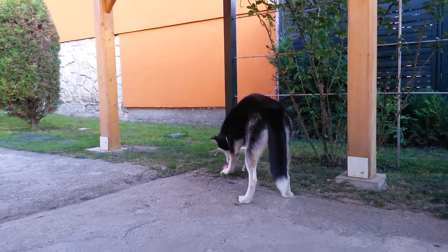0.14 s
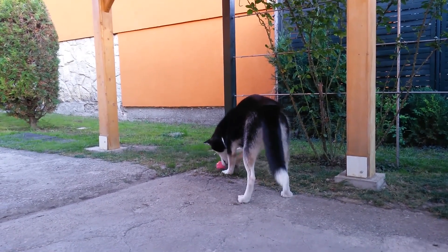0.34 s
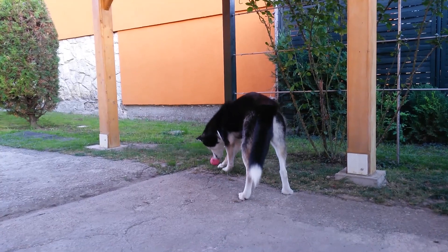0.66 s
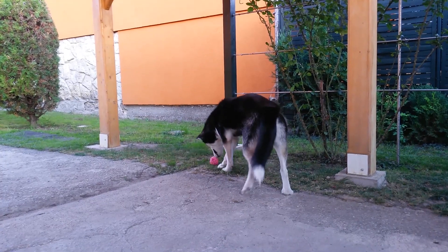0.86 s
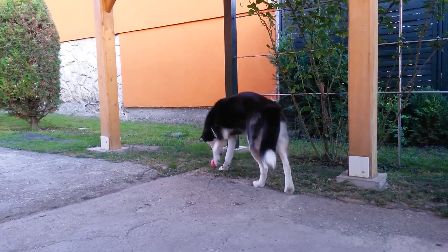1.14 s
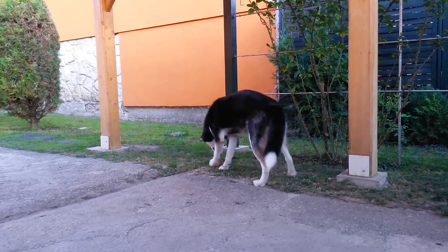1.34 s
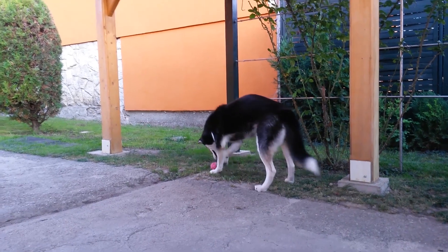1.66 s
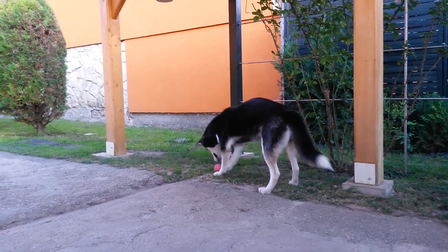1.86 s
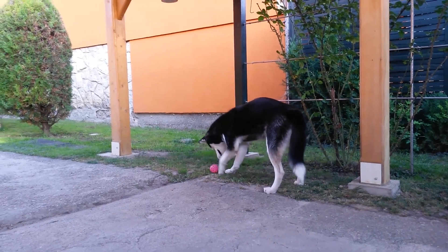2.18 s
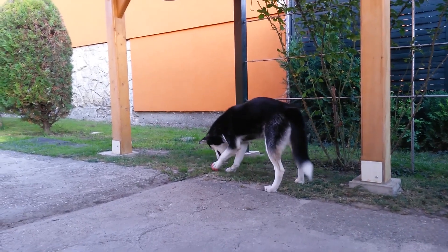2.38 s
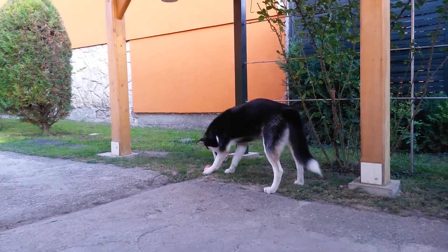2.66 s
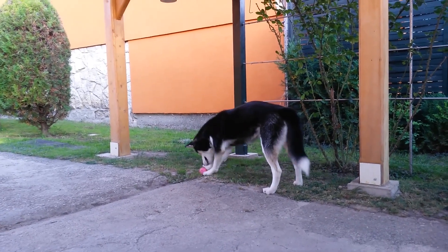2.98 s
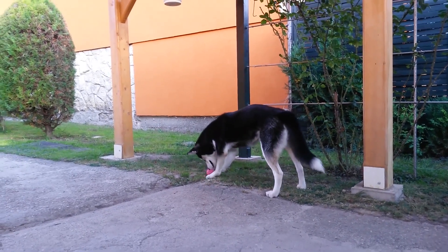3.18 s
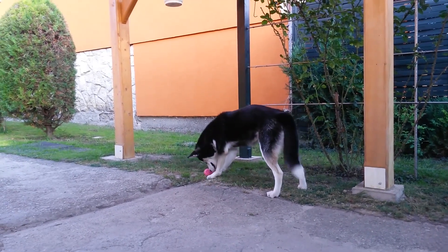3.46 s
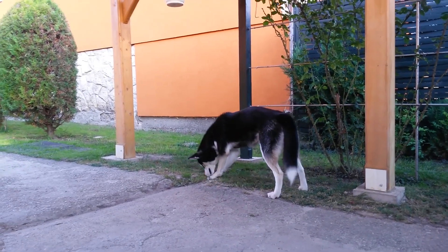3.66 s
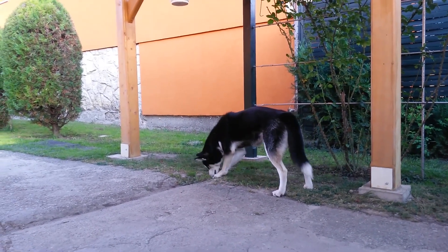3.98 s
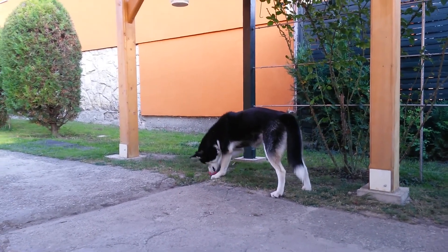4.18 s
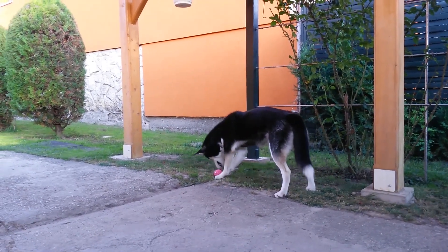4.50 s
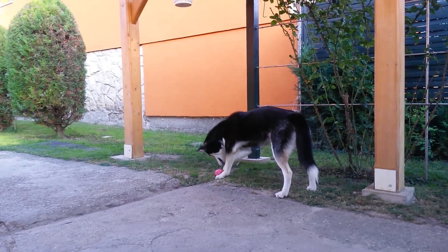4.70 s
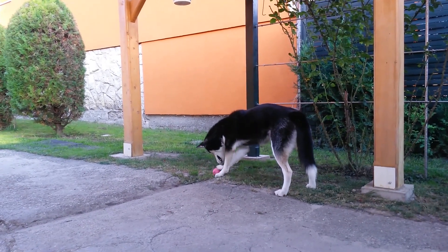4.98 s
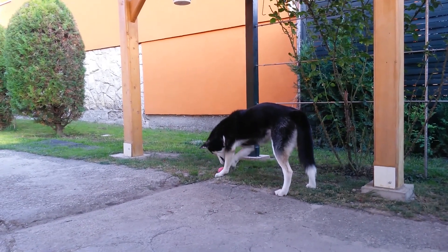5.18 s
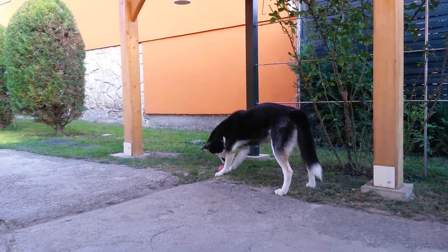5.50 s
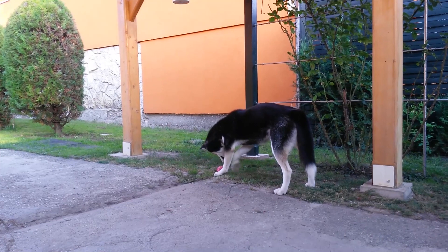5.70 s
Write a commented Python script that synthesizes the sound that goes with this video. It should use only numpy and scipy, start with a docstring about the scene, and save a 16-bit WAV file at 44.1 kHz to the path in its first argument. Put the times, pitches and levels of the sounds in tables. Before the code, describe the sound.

Irregular plastic clicks and gritty scuffs from a dog playing with a ball in a yard, with one short creak and a receding vehicle.

```python
"""At the edge of a concrete yard, a dog noses and paws a hollow plastic ball under a porch roof.
Bursts of impulses ring the ball's shell as clicks and drags; shaped grit makes the scuffs; it judders and squeaks once.
Hard echoes and a short diffuse tail follow the contacts, while a vehicle, shaped noise, recedes.
Far streets, a low hum, a thin whine and hiss lie behind; something ticks once at the right microphone."""
import sys
import numpy as np
from scipy import signal
from scipy.fft import rfft, irfft, next_fast_len
from scipy.io import wavfile
from scipy.ndimage import map_coordinates

SR = 44100
rng = np.random.default_rng(int(sys.argv[2]) if len(sys.argv) > 2 else 0)


def put_to_file(sound):
    """Save the sound as 16-bit audio at rate SR, in the file named by the first command-line argument."""
    columns = np.atleast_2d(sound).T  # one column per channel
    safe = np.clip(columns, -1, 1)
    whole_steps = np.round(safe * 32767)
    wavfile.write(sys.argv[1], SR, whole_steps.astype(np.int16))


N = 257984
TIME = np.arange(N) / SR  # seconds through the scene
T = np.arange(SR // 2) / SR  # seconds within one event

# spectrum of low traffic rumble: f/Hz, relative density/dB per Hz
RUMBLE = [(20, -31), (40, -20), (65, -6.5), (100, -2.5), (137, 3.5), (190, -2.5), (265, -3), (360, -10.5),
          (500, -8), (900, -52)]
# spectrum of tyre roar: f/Hz, relative density/dB per Hz
TYRES = [(200, -20), (400, -11.5), (550, -1.5), (780, -2), (1100, 2), (1500, -3), (2200, -7), (3200, -15.5),
         (6000, -21), (12000, -57)]


def amp(db):
    """Decibels to gain."""
    return 10 ** (np.asarray(db) / 20)


def unit(x):
    """Scale x to rms 1."""
    return x / np.sqrt(np.mean(x ** 2) + 1e-20)


def unit_energy(x):
    """Scale each channel of x to energy 1."""
    return x / np.sqrt(np.sum(x ** 2, axis=-1, keepdims=True) + 1e-20)


def along(points, hz):
    """Read a curve of (Hz, value) points on a log frequency axis."""
    f, value = np.transpose(points)
    return np.interp(np.log(hz + 1), np.log(f + 1), value)


def wobble(rate):
    """A smooth random curve with rate knots a second."""
    knots = rng.standard_normal(int(N * rate / SR) + 4)
    return map_coordinates(knots, [np.arange(N) * rate / SR])


def filtered(x, response):
    """Multiply the spectrum of x by a complex response of frequency."""
    n = x.shape[-1]
    padded = next_fast_len(n + SR // 4)
    hz = np.fft.rfftfreq(padded, 1 / SR)
    return irfft(rfft(x, padded) * response(hz), padded)[..., :n]


def resonate(x, modes):
    """Pass x through parallel resonances, each (Hz, width in Hz, dB)."""
    def response(f):
        return sum(amp(db) * 1j * f * w / (c * c - f * f + 1j * f * w) for c, w, db in modes)
    return filtered(x, response)


def causal(gain):
    """The causal, minimum-phase impulse response with this gain over frequency."""
    cepstrum = irfft(np.log(gain + 1e-9))
    fold = 1 + np.sign(len(cepstrum) // 2 - np.arange(len(cepstrum)))
    fold[0] = 1
    return irfft(np.exp(rfft(cepstrum * fold)))


def add(track, s, sound):
    """Mix a sound into the track at time s."""
    part = track[:, max(round(s * SR), 0):][:, :sound.shape[-1]]
    part += sound[:, :part.shape[-1]]


def diffuse(count):
    """Stereo noise from all around: alike in the bass, unrelated in the treble."""
    # left-right likeness: f/Hz, correlation
    likeness = [(60, 0.94), (130, 0.98), (290, 0.89), (640, 0.77), (1400, 0.082), (15000, 0)]

    def mid_and_side(hz):
        turn = np.arccos(np.clip(along(likeness, hz), -1, 1)) / 2
        return np.array([np.cos(turn), np.sin(turn)])
    mid, side = filtered(rng.standard_normal((2, count)), mid_and_side)
    return np.array([mid + side, mid - side])


def rush(spectrum):
    """Diffuse stereo noise of rms 1 with this spectrum."""
    return unit(filtered(diffuse(N), lambda hz: amp(along(spectrum, hz))))


def yard(x, tail_db=4.5, build=0.0031, lead=.00025):
    """Sound reaches the left side first (lead in s), then come hard echoes and a tail that builds in s."""
    # decay of the tail: f/Hz, t60/s
    decay_times = [(200, 0.56), (1000, 0.23), (3000, 0.33), (7000, 0.31), (13000, 0.2)]
    # post, roof, roof again: delay/s, level/dB
    echoes = [(.0098, -21.5), (0.017, 0), (.0335, -17.5)]
    hz, t, z = signal.stft(diffuse(len(T)), SR, nperseg=256)
    decay = amp(-60 * t / along(decay_times, hz)[:, None])
    tail = signal.istft(z * decay, SR, nperseg=256)[1][:, :len(T)]
    paths = amp(tail_db) * unit_energy(tail * (1 - np.exp(-T / build)))
    for delay, db in [(0, 0.006)] + echoes:  # the direct sound comes first
        paths[0, round(delay * SR)] += amp(db)
        paths[1, round((delay + lead) * SR)] += amp(db)
    return signal.fftconvolve(x[None], unit_energy(paths), axes=1)


def grit(rate, spread_db):
    """Tiny slips of random sign and uneven size, on average rate a second."""
    slips = rng.random(len(T)) < rate / SR
    signs = rng.choice([-1, 1], len(T))
    return slips * signs * amp(spread_db * np.clip(rng.standard_normal(len(T)), -2, 2))


def swell(length):
    """A stroke that rises, peaks at half its length and dies."""
    u = 2 * T / max(length, .004)
    return u ** 2 * np.exp(1 - u ** 2)


def ball(force, body_db, upper_db, snap_db, size=2048):
    """A force rings the ball; body, upper shell and snap are weighed against its lower shell modes."""
    # the ball's wall as a whole: f/Hz, relative level/dB
    body = [(150, -23), (330, -11), (480, -4), (600, 1), (800, -7), (1110, 2.5), (1400, -2), (1750, 3.5),
            (2200, -2.5), (2800, -26), (5000, -46.5)]
    # lower shell modes: f/Hz, relative level/dB
    lower_shell = [(500, -46.5), (1900, -12), (2350, -5), (2620, 3), (2980, 3), (3550, 1), (4000, 1),
                   (4700, -5.5), (5500, -10.5), (8000, -49.5)]
    # upper shell modes: f/Hz, relative level/dB
    upper_shell = [(2500, -55.5), (4200, -12), (5050, -3), (6000, 6), (6900, 7.5), (7800, -3), (9000, -17),
                   (14000, -52)]
    # the contact point: f/Hz, relative level/dB
    snap = [(3000, -50.5), (6500, -12.5), (8100, 1.5), (9500, -0.5), (11000, -7.5), (12500, -18),
            (15000, -14.5)]
    hz = np.fft.rfftfreq(size, 1 / SR)
    parts = [(body, body_db), (lower_shell, 0), (upper_shell, upper_db), (snap, snap_db)]
    power = sum((amp(db) * unit_energy(amp(along(spectrum, hz)))) ** 2 for spectrum, db in parts)
    ringing = signal.fftconvolve(force, causal(np.sqrt(power)))
    return unit_energy(ringing[:len(T)])


def self_noise(db=-78.5):
    """The even hiss of the microphones: white noise, unrelated left and right."""
    return amp(db) * rng.standard_normal((2, N))


def town(rumble_db=-1, tyre_db=-7, air_db=-68, hum_hz=98, hum_db=-73):
    """Far traffic noise swells and ebbs over a low, wavering sine hum and the hiss of open air."""
    # deep rumble of the town: f/Hz, relative density/dB per Hz
    deep_rumble = [(15, -16), (30, -11.5), (55, -0.5), (95, 4.5), (160, -10.5), (400, -24.5)]
    # swell of the traffic: t/s, relative level/dB
    traffic_level = [(0, -65), (1.4, -60), (2.2, -58), (2.8, -67.5), (4.3, -65.5), (5.1, -60.5),
                     (5.85, -59)]
    # far streets and open air: f/Hz, relative density/dB per Hz
    open_air = [(150, -14), (262, -6), (330, -17), (800, -16), (980, -11), (1600, -18.5), (2170, -15.5),
                (2600, -30), (5000, -36), (7000, -30.5), (15000, -39)]
    streets = rush(deep_rumble) + amp(rumble_db) * rush(RUMBLE) + amp(tyre_db) * rush(TYRES)
    swelling = amp(np.interp(TIME, *np.transpose(traffic_level)))
    waver = amp(3 * wobble(13))
    phase = 2 * np.pi * hum_hz * TIME + 0.99 * wobble(10)
    hum = amp(hum_db) * waver * np.sqrt(2) * np.sin(phase)
    return swelling * streets + hum + amp(air_db) * rush(open_air)


def whine(waver=0.0039):
    """A faint, thin whine drifts in from afar for about half a second: one sine of unsteady pitch."""
    # path of the whine: t/s, f/Hz before the waver, level/dB
    glide = [(3.85, 2170, -95), (4.02, 2130, -78), (4.2, 2206, -77.5), (4.37, 2120, -77), (4.45, 2110, -95)]
    s, pitch, db = np.transpose(glide)
    phase = 2 * np.pi * np.cumsum(np.interp(TIME, s, pitch) * (1 + waver * wobble(40))) / SR
    sounding = (TIME > s[0]) * (TIME < s[-1])
    return amp(np.interp(TIME, s, db)) * sounding * np.sin(phase)


def vehicle(surge_db=1.1):
    """A vehicle recedes: rumble, tyre roar and hiss fade at steady rates, drift together and surge apart."""
    # rumble, tyres and hiss in turn: starting level/dB before drift and surge, fade/dB per s
    fades = [(-39.5, 11), (-37.5, 9), (-52.5, 6.5)]
    # spectrum of the hiss: f/Hz, relative density/dB per Hz
    hiss = [(1200, -7), (2600, 0.5), (4000, 5), (5000, -4), (6800, 9.5), (9000, 2.5), (12000, -12),
            (15000, -16.5)]
    drift_db = .5 * wobble(4)
    out = np.zeros((2, N))
    for (db, fade), spectrum in zip(fades, [RUMBLE, TYRES, hiss]):
        level_db = db - fade * TIME + drift_db + surge_db * wobble(14)
        out += amp(level_db) * rush(spectrum)
    return out


def microphone_tick(s=2.4056, db=1.0, swing_hz=80, settle=.0029, brush_db=-29, brush=0.0049,
                    creep_db=-35, creep=0.012):
    """A light brush, then a pressure step on the right port that swings back through the bass cut and creeps to rest."""
    out = np.zeros((2, N))
    # settle, brush and creep are times in s
    step = np.exp(-T / settle) * np.cos(2 * np.pi * swing_hz * T + 0.84) / np.cos(.55)
    recovery = amp(creep_db) * (T / creep) ** 2 * np.exp(2 - 2 * T / creep)
    scrape = resonate(rng.standard_normal(len(T)) * (T < brush), [(3500, 6500, 0)])
    add(out[1:], s, (amp(db) * step + recovery)[None])
    add(out[1:], s - brush, amp(brush_db) * scrape[None])
    return out


def squeak(level_db=-2, octave_db=-8, waver=0.0594, flutter_db=2.5):
    """A wet nose rubs the plastic into one low, unsteady squeak: a wavering tone and its octave."""
    # path of the squeak: t/s, f/Hz before the waver, relative level/dB
    glide = [(3.334, 584, -59), (3.365, 610, -49), (3.405, 591, -50), (3.43, 560, -61)]
    s, pitch, db = np.transpose(glide)
    phase = 2 * np.pi * np.cumsum(np.interp(TIME, s, pitch) * (1 + waver * wobble(150))) / SR
    sounding = (TIME > s[0]) * (TIME < s[-1])
    level = amp(np.interp(TIME, s, db) + level_db + flutter_db * wobble(120)) * sounding
    return level * (np.sin(phase) + amp(octave_db) * np.sin(2 * phase))


def rubbed_notes(level_db=31, width=0.183):
    """A rub or knock draws a short note from the wall: grit through one resonance twice, width relative to pitch."""
    # short notes of the ball: t/s, f/Hz, relative level/dB, length/s
    notes = [(0.784, 2880, -36.5, 0.013), (1.556, 597, -45, 0.026), (1.560, 5070, -31, 0.013),
             (1.725, 760, -55, .022), (2.215, 511, -55, 0.019), (2.515, 3020, -62, 0.022),
             (3.337, 747, -56, .04), (4.972, 617, -61, 0.044), (5.130, 600, -52.5, 0.04),
             (5.199, 1950, -40, .018), (5.346, 1100, -45.5, .003), (5.348, 2550, -46.5, .003),
             (5.524, 523, -55, .038), (5.638, 3000, -52.5, .017)]
    out = np.zeros((2, N))
    for s, hz, db, length in notes:
        wall = [(hz, width * hz, 0)]
        rub = grit(rate=7200, spread_db=4.0) * swell(length)
        note = resonate(resonate(rub, wall), wall)
        add(out, s, amp(db + level_db) * yard(unit_energy(note)))
    return out


def scuffs(level_db=35, coarse=0.95, body_db=1, snap_db=-6):
    """Paws and ball scuff over grit and grass: dense fine slips hiss, sparse coarse ones crunch."""
    # strokes: t/s, relative level/dB, brightness against the lower shell/dB, length/s
    strokes = [(0.021, -53, 13, .053), (0.274, -42, 4.5, 0.058), (0.384, -44, 8.5, 0.025),
               (0.999, -53, 4, 0.058), (1.13, -53, 5, 0.018), (1.93, -47.5, -1, 0.074),
               (2.173, -47.5, 7, .049), (2.741, -60, 10, .014), (3.106, -59.5, 2, 0.029),
               (3.321, -55, -1, 0.061), (3.385, -54.5, 14, 0.029), (3.826, -66.5, -5, 0.015),
               (4.38, -61.5, 0.5, 0.031), (4.498, -55.5, -2, 0.03), (5.078, -55, 0, 0.085),
               (5.186, -38, 2, 0.033), (5.29, -59, 1, 0.063), (5.568, -41.5, 2, 0.049),
               (5.679, -58, 5, .07)]
    out = np.zeros((2, N))
    for s, db, bright, length in strokes:
        fine_sand = unit(grit(rate=3000, spread_db=1.5))
        crunch = coarse * unit(grit(rate=220, spread_db=5.0))
        force = (fine_sand + crunch) * swell(length)
        add(out, s, amp(db + level_db) * yard(ball(force, body_db, bright, bright + snap_db)))
    return out


def judder(s=4.5750, db=-2.5, slip_hz=415, length=0.018, jitter=.11, rough=2.0, squeal_db=-3.5,
           octave_db=-1.0, waver=0.032):
    """The pinned ball sticks and slips: uneven pulses ring the shell in a creak with a falling squeal."""
    # resonances of the juddering shell: f/Hz, width/Hz, relative level/dB
    creak_modes = [(423, 120, -3), (840, 160, -7), (1220, 140, -4), (1650, 220, -4), (2110, 220, -2),
                   (2420, 100, -3.5), (2810, 170, 1), (3530, 180, -12), (3830, 200, -13), (4470, 400, -8.5),
                   (5150, 200, -3.5), (5520, 140, 3), (5820, 100, -6)]
    # the rim slipping: t into the judder/s, f/Hz before the waver, relative level/dB
    rim_slip = [(0, 4153, -5), (.009, 3545, 1.5), (.018, 3043, 1), (0.024, 2850, -2), (.034, 2720, -32)]
    out = np.zeros((2, N))
    turns = np.cumsum(slip_hz * (1 + jitter * wobble(300)[:len(T)])) / SR
    slips = np.diff(np.floor(turns), prepend=-1)  # one pulse at each whole turn
    gate = np.exp(-(T / length) ** 6)
    force = unit_energy(slips * gate) + rough * unit_energy(grit(rate=5600, spread_db=6) * gate)
    times, pitch, level = np.transpose(rim_slip)
    phase = 2 * np.pi * np.cumsum(np.interp(T, times, pitch) * (1 + waver * wobble(916)[:len(T)])) / SR
    tone = np.sin(phase) + amp(octave_db) * np.sin(2 * phase)
    squeal = amp(np.interp(T, times, level)) * (T < times[-1]) * tone
    creak = unit_energy(resonate(force, creak_modes)) + amp(squeal_db) * unit_energy(squeal)
    # the soft paw damps everything above the upper shell modes
    muffled = filtered(creak, lambda hz: 1 / (1 + (hz / 6700) ** 14))
    add(out, s, amp(db) * yard(muffled))
    return out


def clicks(level_db=35, crack=0.0016, chatter=0.64, touch=.003, touch_db=-14, coarse=0.55):
    """Tooth, claw or stone grazes the ball and strikes; it chatters briefly, then drags over sand and grit."""
    # contacts: t/s, relative level/dB, then body, upper shell and snap against the lower shell/dB, drag length/s
    contacts = [(0.6006, -34, -1, 7, -1, 0.044), (0.7855, -37.5, 1.5, 2.5, -3.5, .007),
                (1.427, -45, -1, .5, -8, .038), (1.538, -41.5, 7.5, 5, -7, .008),
                (1.553, -23.5, -15.5, -1.5, -9, 0.0097), (1.8918, -52.5, 2.5, 5, -7, 0.055),
                (2.0127, -36.5, -7, -1.5, -5, 0.019), (2.494, -54, -2.5, .5, -7.5, .026),
                (2.6386, -60, -11, -3.5, -20, 0.018), (3.0362, -52.5, -3, -2, -12, 0.011),
                (3.1331, -46, -8, 2.5, -10, 0.017), (3.2684, -47, -4, -4, -5.5, 0.0049),
                (3.7268, -62, -3, -8, -13, .007), (4.444, -49.5, -12, -4, -25, 0.032),
                (4.524, -55, -5, 3, -14, .007), (4.8688, -55.5, -10, 0, -12, 0.079),
                (4.987, -47.5, -6, 4.5, -10.5, .026), (5.16, -46.5, -5.5, -5, -11, .036),
                (5.204, -34.5, -6, 0, -7.5, 0.011), (5.3481, -45, 1.5, 0.5, -9.5, 0.0042),
                (5.491, -43, -4.5, -3, -10.5, 0.053), (5.765, -45.5, -2, -3.5, -17, 0.0072),
                (5.8445, -43.5, -7, -3, -9, 0.01)]
    equal_drag_s, drag_db_per_decade = .04, 17  # a drag this long matches its blow; shorter ones are weaker
    out = np.zeros((2, N))
    for s, db, body, upper, snap, length in contacts:
        length = max(length, .003)
        rattle = grit(rate=15000, spread_db=6.0) * np.exp(-T / crack)  # crack: decay in s
        blow = (T == 0) + chatter * unit_energy(rattle)
        ground = unit(grit(rate=5000, spread_db=4.5)) + coarse * unit(grit(rate=270, spread_db=3.5))
        drag_gain = amp(drag_db_per_decade * np.log10(length / equal_drag_s))
        drag = drag_gain * unit_energy(ground * np.exp(-(T / length) ** 2))
        # the graze lasts touch seconds before the blow
        graze = amp(touch_db) * unit_energy(grit(rate=12000, spread_db=4)[:round(touch * SR)])
        force = np.concatenate([graze, unit_energy(blow) + drag])
        add(out, s - touch, amp(db + level_db) * yard(ball(force, body, upper, snap)))
    return out


def scene():
    """The dog's play over the sound of the street, tilted left and right by frequency."""
    # stereo balance: f/Hz, left minus right/dB
    balance = [(200, 0.65), (700, 0.5), (1300, -2.5), (4400, -3.5), (8000, -0.5), (15000, 2)]
    background = town() + whine() + vehicle()
    play = squeak() + rubbed_notes() + scuffs() + judder() + clicks()

    def sides(hz):
        return amp(np.outer([.5, -.5], along(balance, hz)))
    return filtered(background + play, sides) + microphone_tick() + self_noise()


def record(dry):
    """A very steep low-pass ends the treble at the band limit."""
    top_hz = 14750
    return filtered(dry, lambda hz: 1 / np.sqrt(1 + (hz / top_hz) ** 120))


dry = scene()
out = record(dry)
put_to_file(out)
```